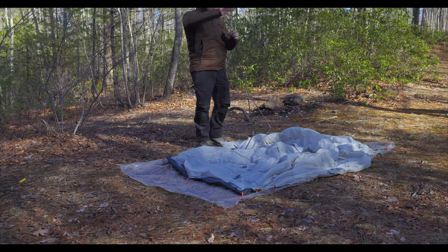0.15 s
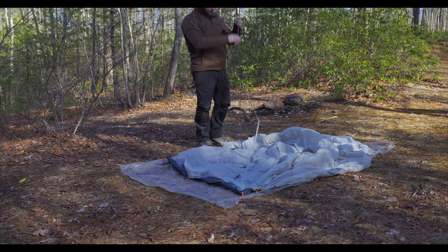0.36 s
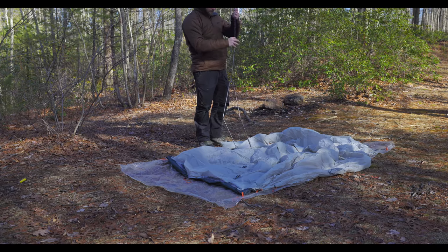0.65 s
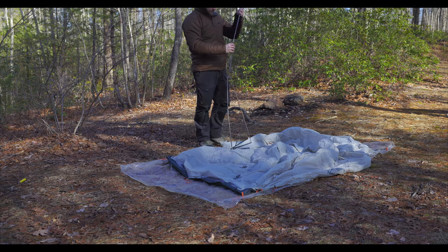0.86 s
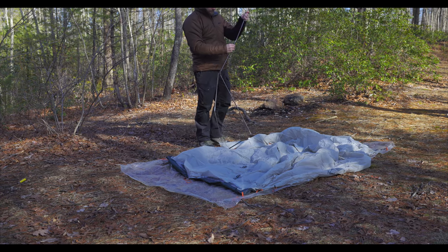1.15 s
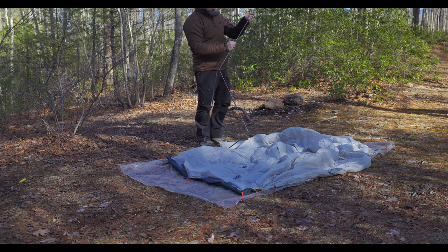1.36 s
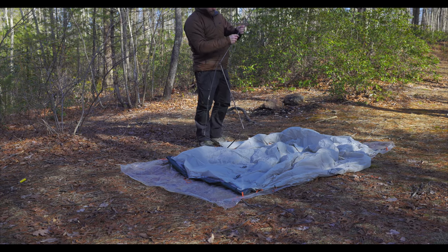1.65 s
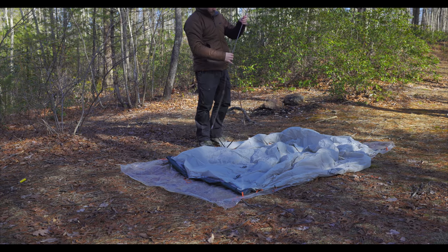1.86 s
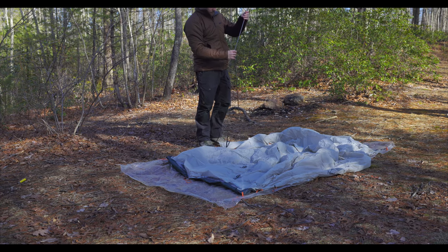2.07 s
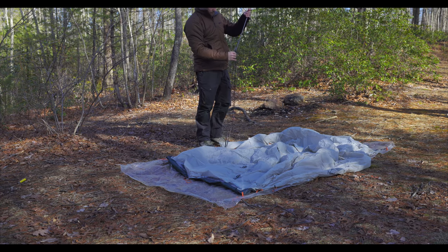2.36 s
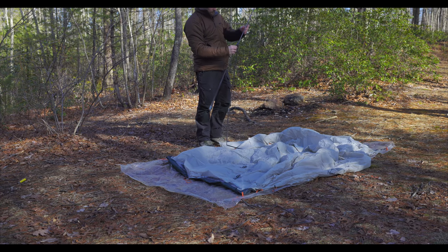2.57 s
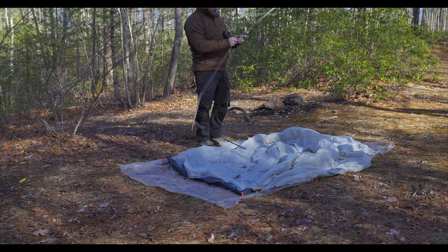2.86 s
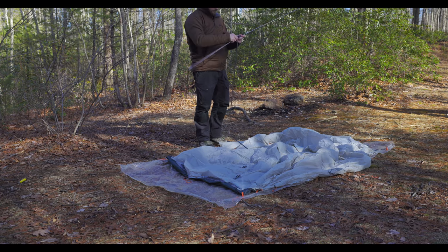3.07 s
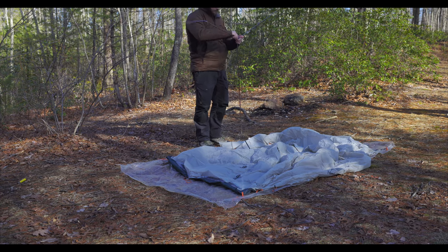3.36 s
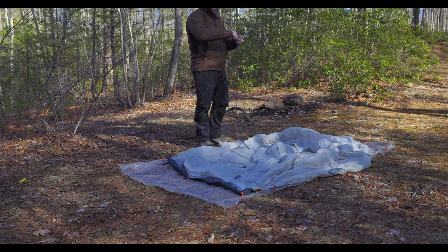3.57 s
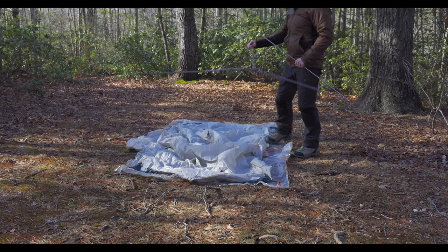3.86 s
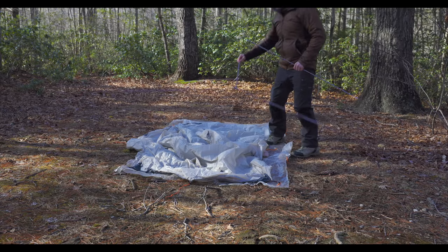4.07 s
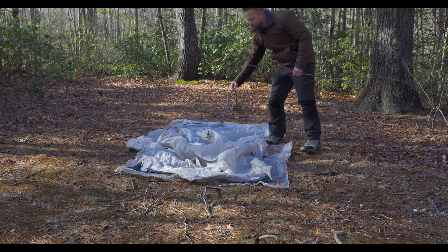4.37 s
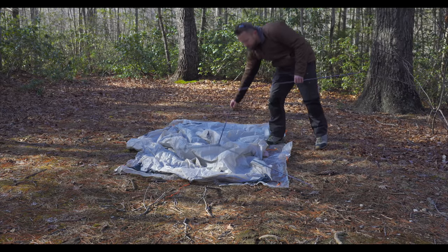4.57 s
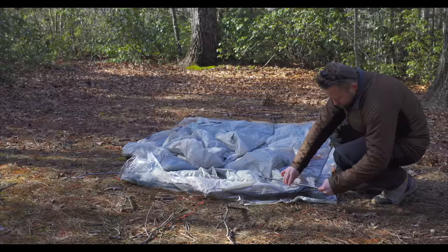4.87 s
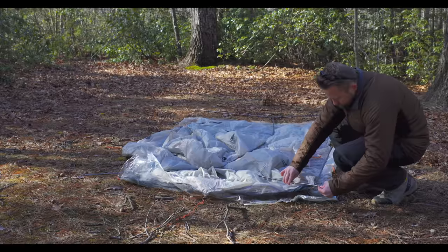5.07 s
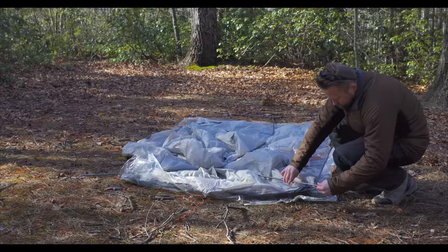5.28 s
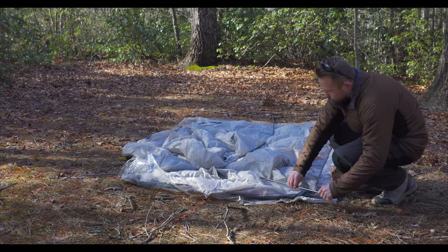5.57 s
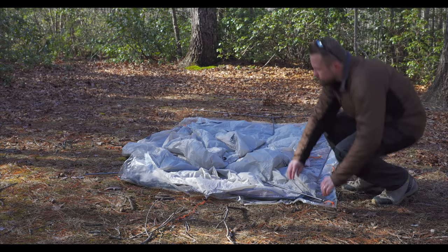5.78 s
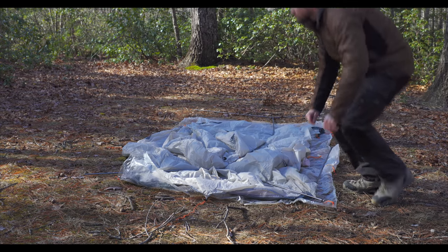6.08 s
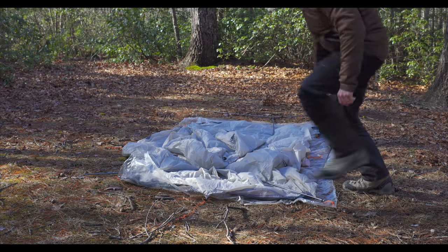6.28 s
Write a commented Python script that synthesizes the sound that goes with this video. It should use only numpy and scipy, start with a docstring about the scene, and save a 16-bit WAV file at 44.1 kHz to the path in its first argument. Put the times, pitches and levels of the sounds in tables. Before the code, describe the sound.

A quiet forest clearing with low rumble, a faint far drone and light hiss; near sounds sit in the centre with a brief, scattered echo from the trees. After a tiny tick at the start, metal tent pole tubes rattle from 0.6 s, thickening into a quick clatter and a loud snap at 0.9 s, another at 1.03 s, with gritty sliding, sleeve swish and a soft leaf crunch. A bright snap follows at 1.5 s, then scrapes and ticks around 1.8-2.6 s with a snap at 2.15 s, a weaker one at 2.75 s and the loudest, crisp, at 3.0 s. A faint click comes at 3.5 s. From 3.7 s thin plastic crinkles, with soft thuds just after 4 s; crackling peaks near 4.75 s with sharp creases and a short scrape. Small rustles and pops continue from 5 s, one clear at 5.2 s, then a dull thud at 6 s and light crinkling to the end.

```python
"""The tubes of a shock-corded tent pole snap, tick and scrape into their joints in a forest clearing.
Each blow is noise shaped like metal contact plus ringing tube tones; sliding is a stream of tiny bursts.
Then a thin plastic ground sheet is pushed about: bursts in many bands crinkle, and single creases pop.
Sleeves swish, a shoe crushes dry leaves early on and the ground thuds softly, all from filtered noise.
Trees return a short noise-like echo over a low rumble, a faint far drone and hiss."""
import sys
import numpy as np
from scipy import signal
from scipy.fft import rfft, irfft, next_fast_len
from scipy.io import wavfile
from scipy.ndimage import uniform_filter1d

SR = 44100
rng = np.random.default_rng(int(sys.argv[2]) if len(sys.argv) > 2 else 0)


def output_pcm(signal):
    """Save a mono or channel-first signal as 16-bit PCM at the path in sys.argv[1].

    Samples are clipped to [-1, 1] before scaling.
    """
    pcm = np.clip(np.atleast_2d(signal).T, -1, 1) * 32767
    wavfile.write(sys.argv[1], SR, np.round(pcm).astype(np.int16))


N = 283122
TIME = np.arange(N) / SR


def undb(db):
    """Turn decibels into a gain."""
    return 10 ** (np.asarray(db) / 20)


def unit(x):
    """Scale to an average (rms) level of 1."""
    return x / np.sqrt(np.mean(x ** 2) + 1e-20)


def unit_peak(x, crest_db=10):
    """Scale so that a peak crest_db above the rms of the loudest 4 ms would reach 1."""
    loudest_power = uniform_filter1d(x ** 2, SR // 250).max()
    return x / np.sqrt(loudest_power) / undb(crest_db)


def level_curve(table):
    """Join the (time_s, level_db) points of a table into a gain for every sample."""
    time_s, level_db = np.transpose(table)
    return undb(np.interp(TIME, time_s, level_db))


def colour(x, tone):
    """Filter with the given (pitch_hz, level_db) response, without sounding ahead of time."""
    size = 2 * next_fast_len(len(x))
    hz, db = np.transpose(tone)
    f = np.maximum(np.fft.rfftfreq(size, 1 / SR), 1)
    response = undb(np.interp(np.log(f), np.log(hz), db))
    # folding the cepstrum gives the minimum-phase filter
    cepstrum = irfft(np.log(response))
    cepstrum[1:size // 2] *= 2
    cepstrum[size // 2 + 1:] = 0
    return irfft(rfft(x, size) * np.exp(rfft(cepstrum)))[:len(x)]


def band(x, lo_hz, hi_hz, order=3):
    """Keep only the range between two pitches."""
    edges = [lo_hz, min(hi_hz, .48 * SR)]
    return signal.sosfilt(signal.butter(order, edges, "band", fs=SR, output="sos"), x)


def walk(rate):
    """Wander at random: levels held 1 / rate s and smoothed twice, with a spread near 1."""
    k = int(SR / rate)
    steps = np.repeat(rng.standard_normal(N // k + 1), k)
    return 1.2 * uniform_filter1d(uniform_filter1d(steps, k), k)[:N]


def fade(t, t60):
    """Die away exponentially, 60 dB down after t60 seconds."""
    return np.exp(-np.log(1000) * t / max(t60, 1e-3))


def grains(rate, spread_db, t60):
    """Many tiny noise bursts at random moments, most weak and a few strong; rate is per second."""
    chance = rng.random(N)
    size = np.minimum(rng.exponential(size=N), 4)
    starts = (chance < rate / SR) * undb(spread_db * size) ** 2
    energy = signal.lfilter([1], [1, -fade(1 / SR, t60) ** 2], starts + 1e-12)
    return unit(np.sqrt(energy) * rng.standard_normal(N))


def add(track, s, sound):
    """Mix a sound into a track at time s."""
    i = max(int(s * SR), 0)
    track[i:i + len(sound)] += sound[:max(N - i, 0)]


def effort(moves, attack_s, release_s):
    """Gain of overlapping (start, end, dB) movements: each builds up, holds, dies away; powers add."""
    power = 0
    for start, end, db in moves:
        rise = np.clip((TIME - start) / attack_s, 0, 1)
        fall = np.exp(-np.maximum(TIME - end, 0) / release_s)
        power = power + (undb(db) * rise * fall) ** 2
    return np.sqrt(power)


def scatter(span, count, db, spread_db):
    """Spread small events unevenly over a span: rows of (s, dB, random tint from -1 to 1)."""
    chance = rng.random((count, 3))
    times = span[0] + (span[1] - span[0]) * (np.arange(count) + chance[:, 0]) / count
    return zip(times, db + spread_db * (2 * chance[:, 1] - 1), 2 * chance[:, 2] - 1)


# Loudness of the low outdoor rumble, before a small boost: time_s, level_db
RUMBLE_LEVEL = [(0, -50), (1.9, -54), (2.7, -50), (3.3, -52), (4.1, -44.5), (5.3, -49.5), (6.42, -46.5)]
# Tone of the rumble: pitch_hz, level_db (per Hz)
RUMBLE_TONE = [(15, -18), (25, -23), (45, -4.5), (70, -2), (114, -3.5), (160, -9.5), (210, -15.5),
               (320, -30), (600, -61)]
# Loudness of the far drone low in the woods, before a small boost: time_s, level_db
DRONE_LEVEL = [(0, -60.5), (2.75, -56.5), (3.3, -62), (6.42, -66)]
# Tone of the woodland hiss: pitch_hz, level_db (per Hz)
AIR_TONE = [(150, -15.5), (400, -12), (550, -11), (800, -13.5), (1300, -22.5), (2200, -26.5), (3400, -33),
            (4500, -27.5), (8000, -29), (12500, -28.5), (14000, -56)]


def forest():
    """Low rumble, far drone and slowly swelling hiss, all filtered noise; nearly alike on both sides."""
    def layers():
        rumble = level_curve(RUMBLE_LEVEL) * unit(colour(rng.standard_normal(N), RUMBLE_TONE))
        drone = level_curve(DRONE_LEVEL) * unit(band(rng.standard_normal(N), 207, 362, order=2))
        air_db = -62 + .5 * walk(0.71)
        air = undb(air_db) * unit(colour(rng.standard_normal(N), AIR_TONE))
        return undb(0.44) * rumble + undb(1.0) * drone + air
    middle, difference = layers(), layers()
    return middle + undb(-22) * difference * np.array([[1], [-1]])


# Tone of the echo off the trees: pitch_hz, level_db
def trees(x, t60, wet_db, trunk_db, trunk_s):
    """Undergrowth scatters sound into a thin noisy tail; a big trunk adds one clearer return."""
    t = np.arange(int(.8 * SR)) / SR
    patchy = undb(4.7 * walk(140)[:len(t)])
    build_up = 1 - np.exp(-t / 0.0014)
    tail = rng.standard_normal(len(t)) * patchy * fade(t, t60) * build_up
    trunk = rng.standard_normal(len(t)) * (t > trunk_s) * fade(np.abs(t - trunk_s), 0.03)
    echo = undb(wet_db) * tail / np.linalg.norm(tail) + undb(trunk_db) * trunk / np.linalg.norm(trunk)
    echo = colour(echo, [(200, -3.5), (3500, 1.0), (8000, -1.0), (15000, -5)])
    return signal.fftconvolve(x, echo)[:N]


# Soft low thuds as he shifts his weight: middle_s, level_db, pitch_hz, length_s
THUDS = [(4.09, -39.5, 70, 0.017), (4.183, -41, 65, 0.035), (4.34, -44, 50, 0.022),
         (5.988, -37.5, 60.5, 0.035)]


def thuds():
    """The springy forest floor gives short swells of dull bass noise."""
    out = np.zeros(N)
    for s, db, hz, length in THUDS:
        swell = np.exp(-((TIME - s) / length) ** 2 / 2)
        boom = swell * band(rng.standard_normal(N), hz / 1.46, hz * 1.28, order=2)
        out += undb(db) * boom * np.sqrt(np.sum(swell ** 2) / np.sum(boom ** 2))
    return out


# A shoe shifting on the leaf litter: start_s, end_s, level_db
STEPS = [(.6, 1.4, -63), (.89, 0.93, -46), (1.1, 1.163, -48)]


def leaves():
    """Dry litter crushed softly under a shoe: many small bursts in the lower middle range."""
    crush = unit(band(grains(rate=670, spread_db=1.5, t60=0.026), 260, 1000, order=2))
    return effort(STEPS, attack_s=0.02, release_s=0.04) * crush


# The hands feed the pole along; the tubes and sleeves each turn this down: start_s, end_s, level_db
FEEDS = [(-.1, .55, -56), (.62, 1.14, -45), (1.2, 1.75, -63), (2.42, 3.25, -65.5)]
FEED_ATTACK_S = 0.11


def feeding():
    """How briskly the hands move the pole; drives both the sliding tubes and the sleeves."""
    # until 3.41 s the pole shifts slightly in the grip
    hold = (FEEDS[0][0], 3.41, -63)
    return effort([*FEEDS, hold], FEED_ATTACK_S, release_s=0.115)


# Tone of the swishing sleeves: pitch_hz, level_db (per Hz)
SWISH_TONE = [(250, -9), (500, -3.5), (1000, 1), (2000, -2.5), (3300, -2), (4500, -11), (9000, -11.5),
              (14000, -34.5)]


def jacket():
    """Sleeves rub in many tiny bursts as the hands feed the pole, and brush faintly in between."""
    swish = unit(colour(grains(rate=910, spread_db=4.0, t60=0.015), SWISH_TONE))
    brush = effort([(1.2, 2.8, -62)], FEED_ATTACK_S, release_s=0.23)
    return np.hypot(undb(-6) * feeding(), brush) * swish


# Tone of the thin plastic sheet: pitch_hz, level_db (per Hz)
SHEET_TONE = [(120, -35.5), (200, 1), (304, -5.5), (497, -7), (544, -6), (715, -7), (1030, -6.5),
              (2380, -10.5), (3180, -9), (4410, -14), (5910, -9.5), (13900, -22.5), (15500, -28)]


def buckling(edges_hz, rate, spread_db, t60, shared_db):
    """Folds of every size: large ones sound across the range, small ones each in a narrow band."""
    broad = undb(shared_db) * grains(rate, spread_db, t60)
    folds = np.zeros(N)
    for lo, hi in zip(edges_hz, edges_hz[1:]):
        folds += band(grains(rate / 3, spread_db, t60) + broad, lo, hi)
    return unit(colour(folds, SHEET_TONE))


# Single creases and dry leaves popping, before sheet() turns them down 2 dB:
# start_s, level_db, pitch_hz, treble_db
CREASES = [(1.117, -25, 1290, -10), (3.965, -33.5, 890, -10), (4.053, -32, 3100, -6), (4.209, -29, 3210, 2),
           (4.444, -28.5, 3250, -18), (4.552, -24.5, 3340, 6), (4.663, -25, 3200, -12),
           (4.731, -19, 1300, -2), (4.757, -17, 2600, 0), (4.827, -22, 2510, 3), (5.006, -34.5, 1190, -9.5),
           (5.2184, -24, 2770, 8.5), (5.326, -33.5, 3130, 2), (5.758, -43, 1720, -3),
           (6.1555, -30.5, 3460, 5), (6.222, -39, 2510, 5)]
# small creases giving way at random under the fingers, turned down alike
PRESS_SPAN_S, PRESS_COUNT, PRESS_LEVEL_DB = (4.92, 5.78), 11, -35.5
PRESS_PITCH_HZ, PRESS_TREBLE_DB = 1500, -8  # the pitch is the middle of a random spread


def creases():
    """A fold flips over: a sharp crack and a brief note from the patch of film around it."""
    out, t = np.zeros(N), np.arange(SR // 8) / SR
    faint = [(s, db, PRESS_PITCH_HZ * 1.27 ** tint, PRESS_TREBLE_DB)
             for s, db, tint in scatter(PRESS_SPAN_S, PRESS_COUNT, PRESS_LEVEL_DB, spread_db=0.5)]
    for s, db, hz, treble_db in [*CREASES, *faint]:
        force = fade(t, 0.036) + undb(-4.5) * fade(t, 0.0067)
        click = colour(force * rng.choice([-1, 1], len(t)), SHEET_TONE)
        note = unit(band(click, hz, hz * 1.08, order=1))
        crack = unit(band(click, 250, 5900, order=2))
        treble = unit(band(click, 5900, 11300))
        pop = undb(2.0) * note + undb(4.5) * crack + undb(treble_db) * treble
        add(out, s, undb(db) * unit_peak(pop))
    return out


# Pushes on the sheet, long drags with short tugs on top:
# start_s, end_s, crinkle_db, ground_scuff_db (against the crinkle, before a small boost), release_s
PUSHES = [(3.678, 3.964, -63.5, -3, 0.026), (3.949, 4.05, -49.5, -4.5, .03), (4.015, 4.114, -44, -6, 0.028),
          (4.114, 4.204, -43.5, -11.5, 0.054), (4.2, 4.513, -53, -4.5, 0.027),
          (4.531, 4.9, -47.5, -8.5, 0.0041), (4.61, 4.636, -40, -8, 0.026),
          (4.665, 4.844, -45.5, -3.5, 0.036), (4.73, 4.772, -34.5, -6.5, 0.035),
          (4.94, 6.45, -58.5, -2, 0.024), (5.198, 5.231, -49, -1, 0.039), (5.473, 6.45, -57, -4.5, .03),
          (5.714, 5.813, -50.5, -16, 0.018), (6.048, 6.182, -55, -3, 0.035),
          (6.304, 6.374, -54.5, 0, 0.034)]
# crackle against the crinkle at a firm push, and its extra rise in dB per dB of push
FIRM_PUSH_DB, CRACKLE_DB, CRACKLE_GROWTH = -42, -7, 0.29


def sheet():
    """Thin plastic buckles densely over leaves, with single creases standing out."""
    pushes = np.array([effort([(start, end, db)], attack_s=0.025, release_s=release_s)
                       for start, end, db, _, release_s in PUSHES])
    on_ground = undb([row[3] for row in PUSHES])
    crinkle = np.linalg.norm(pushes, axis=0)
    scuff = np.linalg.norm(pushes * on_ground[:, None], axis=0)
    # harder pushes snap more small folds
    crackle = undb(CRACKLE_DB) * crinkle * (crinkle / undb(FIRM_PUSH_DB)) ** CRACKLE_GROWTH
    # small folds snap quickest; the ground under the sheet answers more slowly
    small = buckling([4400, 6500, 10000, 16000], rate=1100, spread_db=3.4, t60=.009, shared_db=2)
    medium = buckling([950, 1500, 2400, 4100], rate=1100, spread_db=3, t60=.013, shared_db=0)
    ground = buckling([200, 480, 950], rate=1000, spread_db=2.5, t60=0.015, shared_db=3.0)
    folds = crackle * small + crinkle * medium
    return folds + undb(2.04) * scuff * ground + undb(-2.0) * creases()


# Tone of metal sliding: pitch_hz, level_db (per Hz)
SLIDE_TONE = [(400, -30.5), (1500, -1), (2400, 0), (3400, 4.5), (4400, -2.5), (6500, -9), (10000, -16.5),
              (15000, -21)]
# Short strokes of metal on metal or film: middle_s, level_db, half_length_s, treble_db
SCRAPES = [(0.822, -44.5, 0.029, -9), (0.888, -42.5, .011, -6), (1.342, -49, 0.023, -2.5),
           (1.784, -46.5, 0.0089, 2), (1.942, -45, 0.012, -7), (2.013, -49.5, 0.009, 11),
           (2.085, -44, 0.018, -1), (2.134, -45.5, 0.012, 2), (2.546, -51.5, 0.0089, 1),
           (3, -43.5, 0.012, -6.5), (4.63, -36.5, 0.014, -8), (4.67, -41.5, 0.023, -16)]


def scrapes():
    """A ferrule grates along the tube wall, swelling and dying within one short stroke."""
    grit = colour(grains(rate=1300, spread_db=1.5, t60=0.0064), SLIDE_TONE)
    low, high = unit(band(grit, 1550, 6700)), unit(band(grit, 7300, 17500))
    out = np.zeros(N)
    for s, db, half, treble_db in SCRAPES:
        stroke = np.exp(-((TIME - s) / half) ** 2 / 2)
        mix = (low + undb(treble_db) * high) / np.hypot(1, undb(treble_db))
        out += undb(db) * stroke * mix
    return out


# Tone of tube meeting joint: pitch_hz, level_db (per Hz)
JOINT_TONE = [(200, -15), (600, -7.5), (1300, -6), (2000, -7), (3200, -2), (3900, -1), (4400, -7.5),
              (6500, -4), (9000, -3), (14000, -4), (16000, -13)]
# Ringing tones of the tube, before random shifts per blow: pitch_hz, ring_time_s (to -60 dB), level_db
TUBE_TONES = [(2305, 0.027, -17), (2780, 0.048, -2), (3146, 0.089, 1.5), (3440, 0.21, 1),
              (3536, 0.09, -5.5), (5020, 0.11, -23), (6060, 0.02, -1), (5800, 0.016, -23),
              (6610, 0.039, -3.5), (8150, 0.023, 2), (11500, 0.033, -18)]


def knock(t, rise_ms, rattle_ms, t60, ring_db):
    """Tube meets ferrule: contact builds up, rattles for milliseconds, then chatters and rings faintly."""
    onset = np.minimum(t * 1000 / max(rise_ms, .05), 1)
    force = onset * fade(np.maximum(t - rattle_ms / 1000, 0), t60)
    # the loose joint goes on chattering unevenly while it settles
    steps = np.repeat(rng.standard_normal(len(t) // 128 + 1), 128)
    uneven = undb(4 * uniform_filter1d(steps, 64))[:len(t)]
    chatter = undb(-19.5) * onset * uneven * fade(t, 0.11)
    contact = colour((force + chatter) * rng.choice([-1, 1], len(t)), JOINT_TONE)
    # the grip shifts, so the tones differ in strength (dB) and pitch (share) from blow to blow
    shifts = rng.standard_normal((len(TUBE_TONES), 2)) * [3, .025]
    ring = np.zeros(len(t))
    for (hz, ring_s, db), (louder, sharper) in zip(TUBE_TONES, shifts):
        ring += undb(db + louder) * fade(t, ring_s) * np.sin(2 * np.pi * hz * (1 + sharper) * t)
    hand_damping = fade(t, .07)
    return unit(contact) + undb(ring_db) * unit(onset * hand_damping * ring)


# Loose tube ends knocking, before pole() turns them down 2 dB:
# start_s, level_db, treble_db (against the middle)
TICKS = [(0.014, -28, 3), (0.5858, -23.5, 4.5), (.61, -28.5, -10), (0.6658, -25.5, -5),
         (.6927, -19.5, -7.5), (0.707, -29, -1), (0.7352, -28, -2), (0.7522, -25, -6), (0.7805, -19.5, -5),
         (0.8044, -18, -4), (.817, -19.5, -3), (0.893, -14.5, -5), (0.9197, -14, 0), (.9458, -11, -7),
         (0.9618, -18.5, -6), (1.054, -23.5, -9), (1.48, -29.5, -13), (1.841, -35, -18),
         (1.908, -29.5, -13), (1.9636, -24.5, -14), (2.077, -27.5, -20), (2.1187, -21.5, -14),
         (2.184, -25.5, -7), (2.232, -30.5, -13), (2.343, -30.5, -19), (2.425, -22, 1), (2.446, -32, -11),
         (2.457, -30, -28), (2.565, -27, 8), (2.581, -27.5, -26), (2.9265, -33, -12), (3.2352, -38, -34),
         (3.506, -30, -17)]
# fainter knocks of the dangling sections at random, turned down alike; level and treble vary around these
JIGGLE_SPAN_S, JIGGLE_COUNT, JIGGLE_LEVEL_DB, JIGGLE_TREBLE_DB = (.6, 3), 12, -42.5, -6.5


def ticks():
    """Light single knocks of the dangling sections; a treble-heavy, hard knock dies sooner."""
    out, t = np.zeros(N), np.arange(SR // 8) / SR
    faint = [(s, db, JIGGLE_TREBLE_DB + 6 * tint)
             for s, db, tint in scatter(JIGGLE_SPAN_S, JIGGLE_COUNT, JIGGLE_LEVEL_DB, spread_db=10.5)]
    for s, db, treble_db in [*TICKS, *faint]:
        t60 = 0.014 if treble_db > 0 else .038
        blow = knock(t, rise_ms=0.11, rattle_ms=1.4, t60=t60, ring_db=-3.5)
        middle = unit(band(blow, 690, 3870))
        upper = unit(band(blow, 4870, 8000))
        treble = unit(band(blow, 5800, 20000))
        blow = middle + undb(treble_db / 2 + 2.5) * upper + undb(treble_db) * treble
        add(out, s, undb(db) * unit_peak(blow))
    return out


# Pole sections snapping home: start_s, level_db, note_hz,
# body_db, upper_db, treble_db (all three against the note), rise_ms, rattle_ms
SNAPS = [(0.9079, -5.5, 3200, -16.5, -2, -2.5, 1.1, 4), (1.031, -14, 3240, -17.5, -4.5, -7.5, .44, 3.1),
         (1.493, -12, 3830, -10.5, -4, 1.5, 1.3, 1.1), (1.9394, -21, 3260, -21, -9, -12, 1.1, 1.8),
         (1.945, -18.5, 3430, -13.5, -6.5, -10.5, 0.63, 1.6),
         (2.1451, -12, 2320, -23.5, -4.5, -7, 4.1, 4.5), (2.7456, -20, 3070, -10, 0, 0, 1, 5.9),
         (3.0052, -4, 3170, -20, -.5, -3, 0.54, 0.85), (3.4901, -22, 2740, -14.5, -8.5, -12.5, 1.3, 6.2)]


def snaps():
    """The cord pulls a section home: a noisy metal blow with its own broad note and brightness."""
    out, t = np.zeros(N), np.arange(SR // 8) / SR
    for s, db, hz, body_db, upper_db, treble_db, rise_ms, rattle_ms in SNAPS:
        blow = knock(t, rise_ms, rattle_ms, t60=0.024, ring_db=-11.0)
        body = unit(band(blow, 380, 1500))
        centre = unit(band(blow, 1750, 4300))
        upper = unit(band(blow, 4900, 7800))
        treble = unit(band(blow, 7800, 15800))
        note = unit(band(centre, hz / 1.7, hz * 1.28, order=1))
        blow = undb(body_db) * body + note + undb(upper_db) * upper + undb(treble_db) * treble
        add(out, s, undb(db) * unit_peak(blow))
    return out


def pole():
    """Metal tubes meet in loud snaps, light knocks and short scrapes, with a gritty slide between them."""
    slide = unit(colour(grains(rate=420, spread_db=3.0, t60=.025), SLIDE_TONE))
    return snaps() + undb(-2) * ticks() + scrapes() + undb(-4) * feeding() * slide


def scene():
    """Put the near sounds straight ahead, then add their echo, the thuds and the forest."""
    near = pole() + jacket() + sheet() + leaves()
    echo = trees(near, t60=.35, wet_db=-17.5, trunk_db=-35.0, trunk_s=0.084)
    return near + echo + thuds() + forest()


def record(dry):
    """Each microphone channel adds its own thin hiss; the recorder cuts the top above 15900 Hz."""
    hiss = undb(-76.5) * unit(band(rng.standard_normal((2, N)), 7000, 13400, order=6))
    top_cut = signal.ellip(8, .2, 70, 15900, fs=SR, output="sos")
    return signal.sosfilt(top_cut, dry + hiss)


dry = scene()
out = record(dry)
output_pcm(out)
```